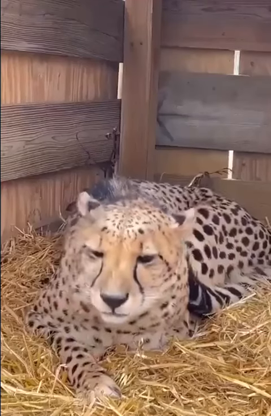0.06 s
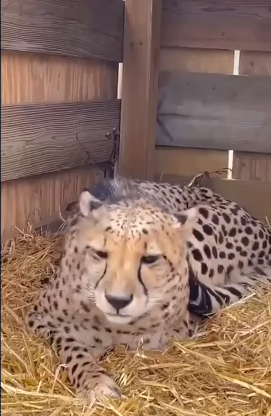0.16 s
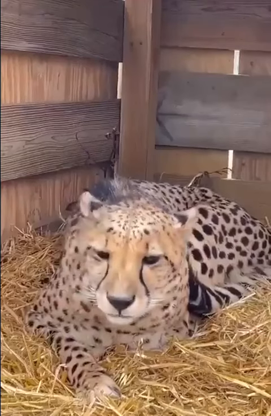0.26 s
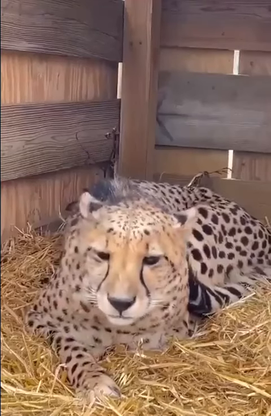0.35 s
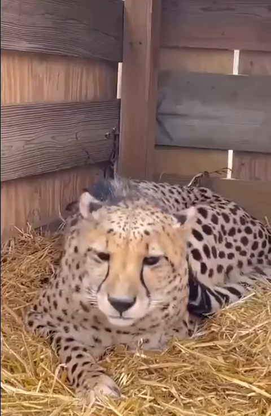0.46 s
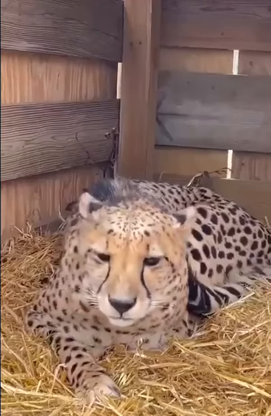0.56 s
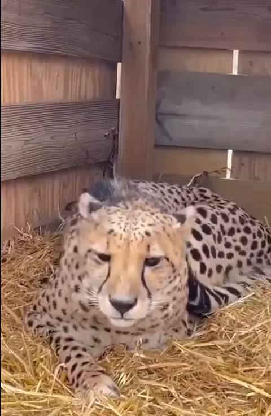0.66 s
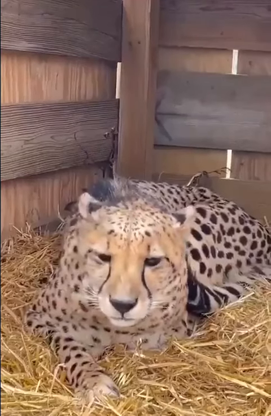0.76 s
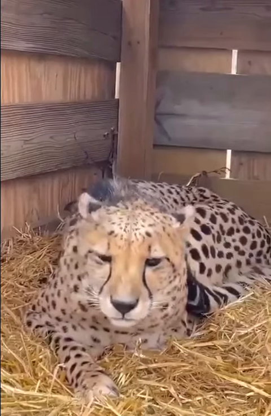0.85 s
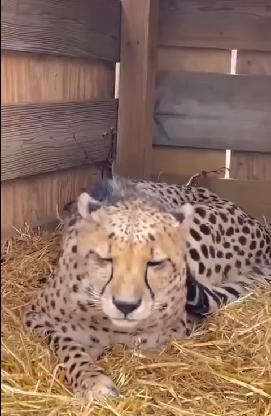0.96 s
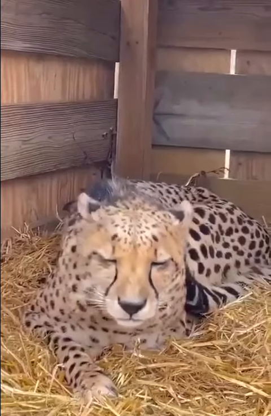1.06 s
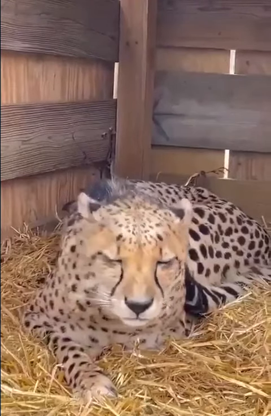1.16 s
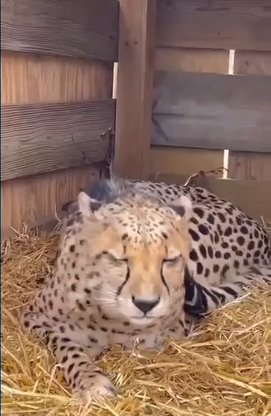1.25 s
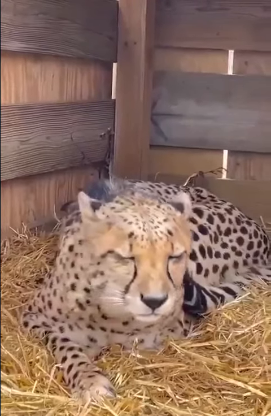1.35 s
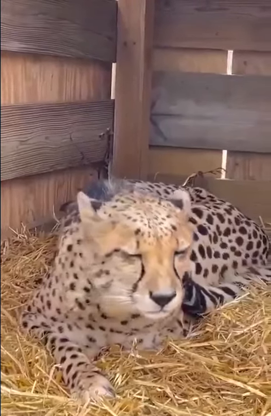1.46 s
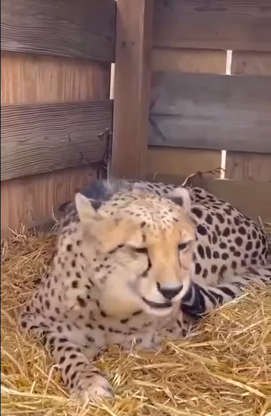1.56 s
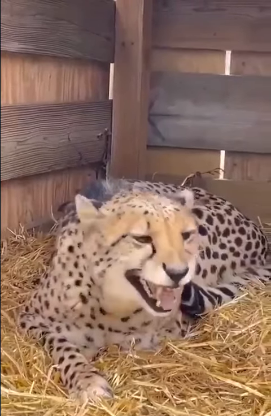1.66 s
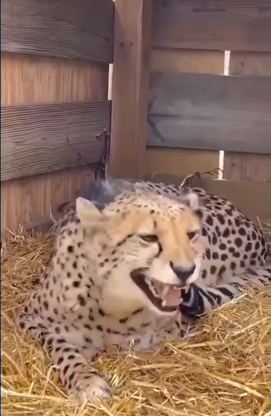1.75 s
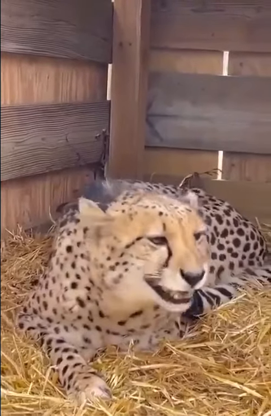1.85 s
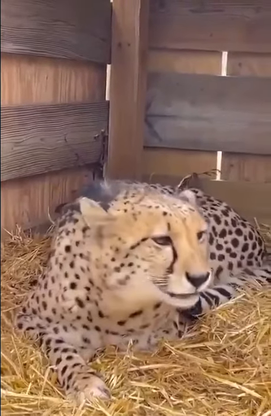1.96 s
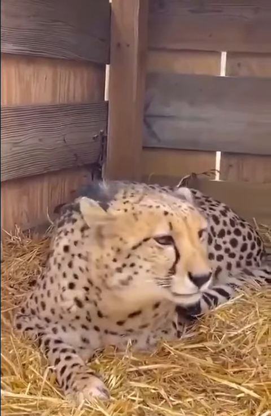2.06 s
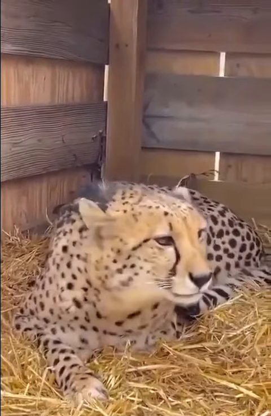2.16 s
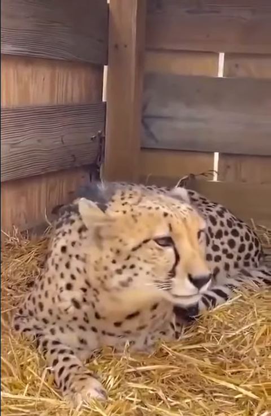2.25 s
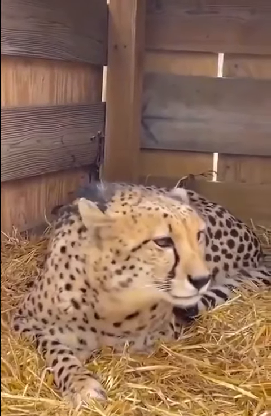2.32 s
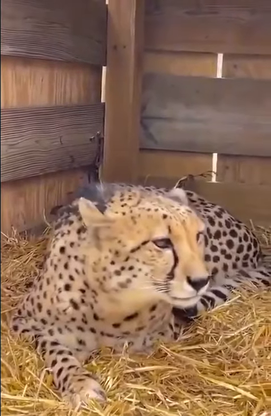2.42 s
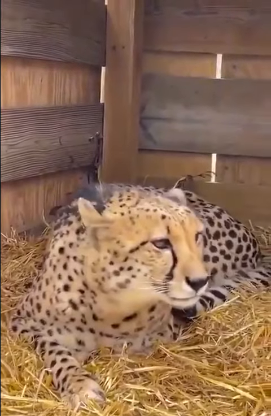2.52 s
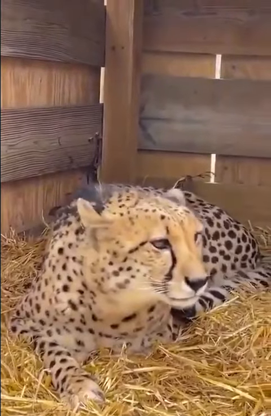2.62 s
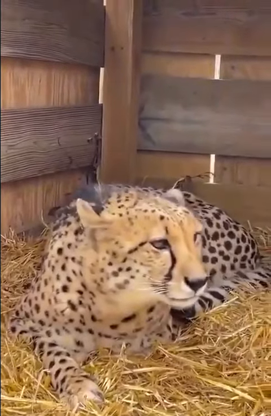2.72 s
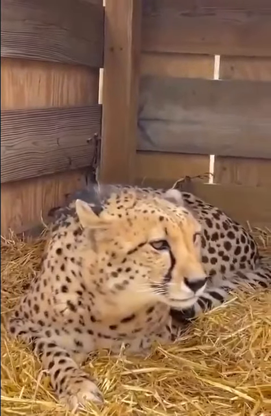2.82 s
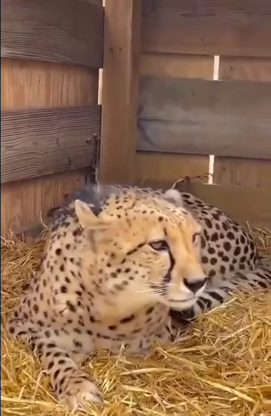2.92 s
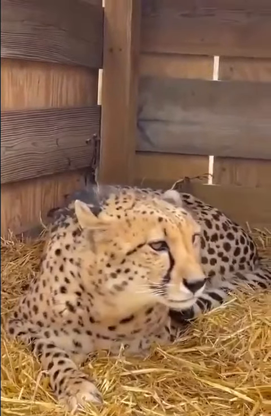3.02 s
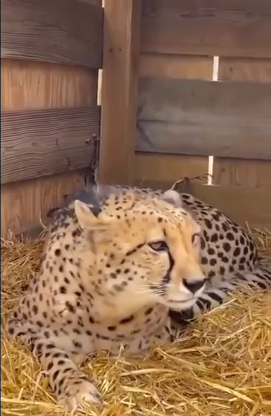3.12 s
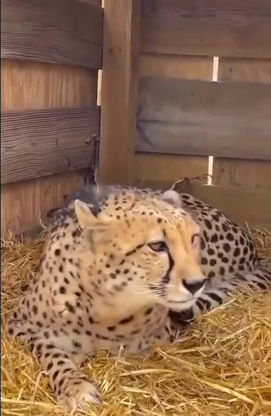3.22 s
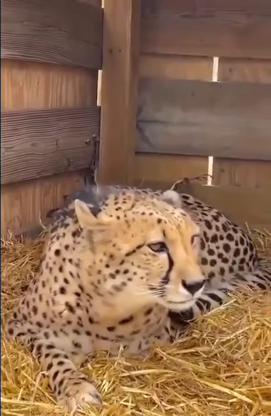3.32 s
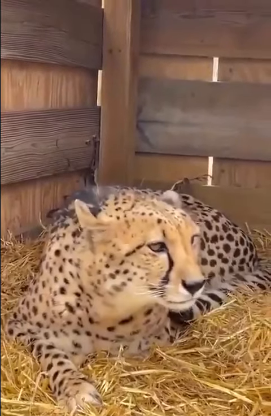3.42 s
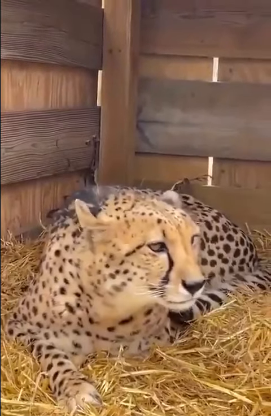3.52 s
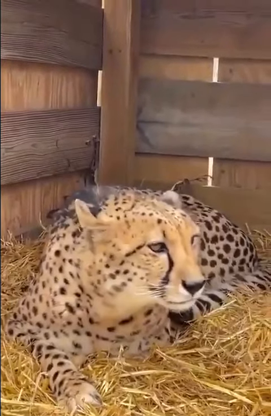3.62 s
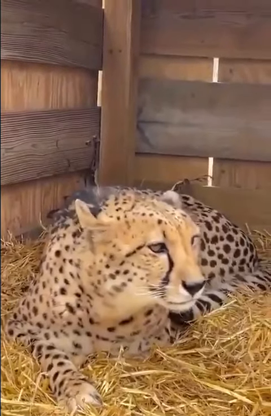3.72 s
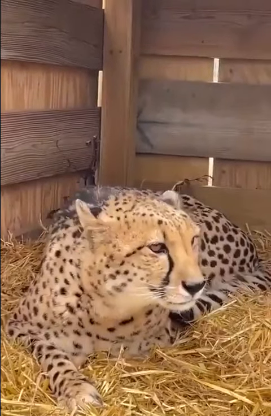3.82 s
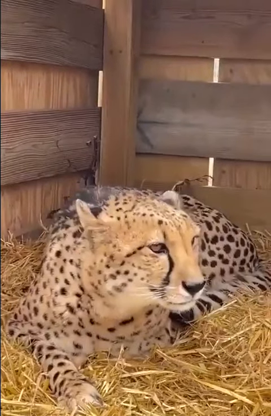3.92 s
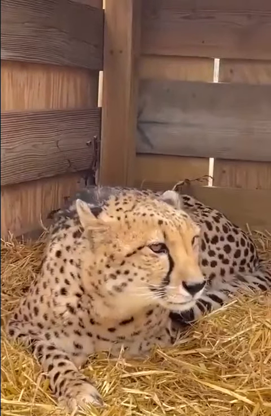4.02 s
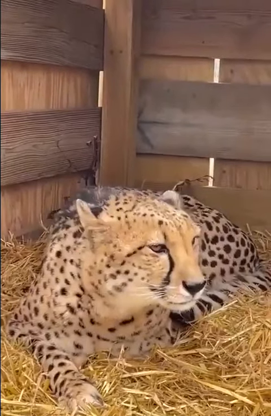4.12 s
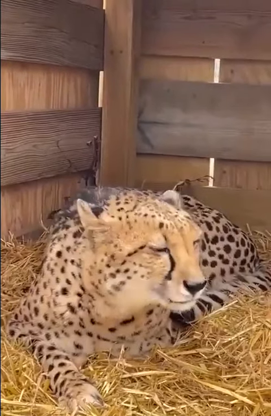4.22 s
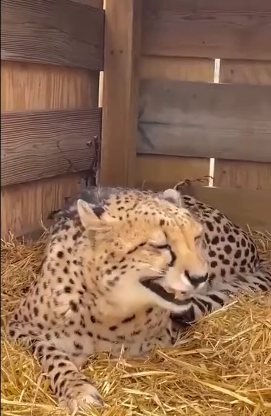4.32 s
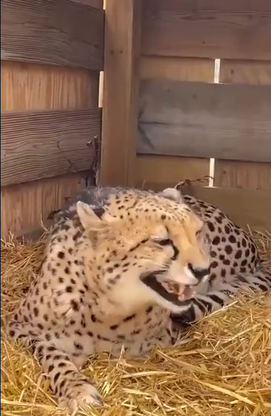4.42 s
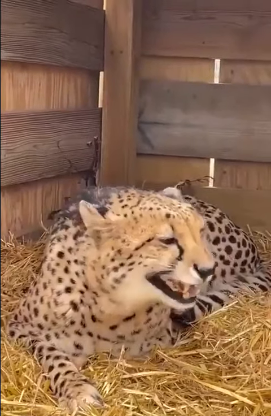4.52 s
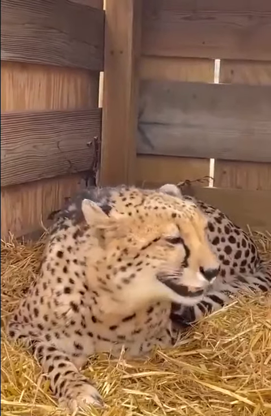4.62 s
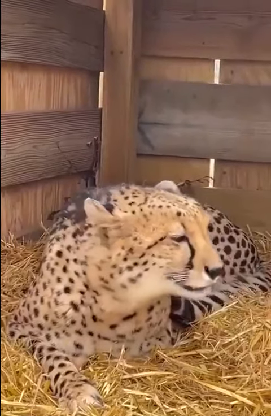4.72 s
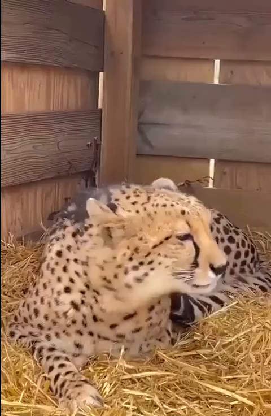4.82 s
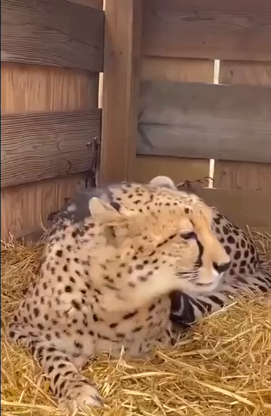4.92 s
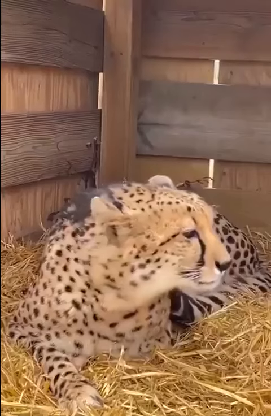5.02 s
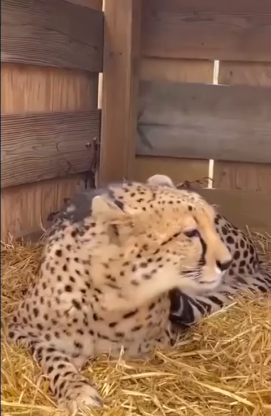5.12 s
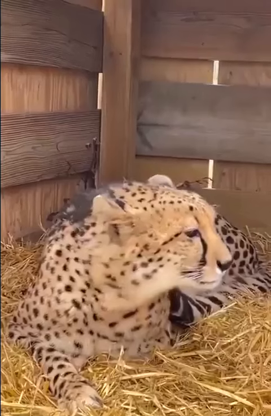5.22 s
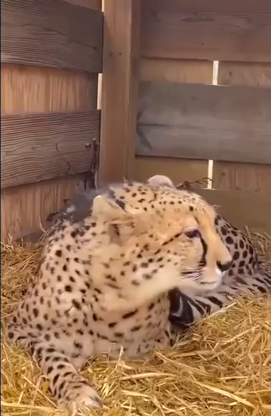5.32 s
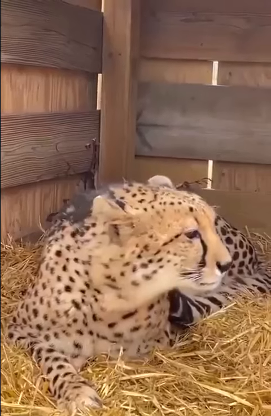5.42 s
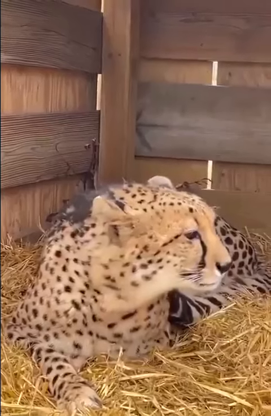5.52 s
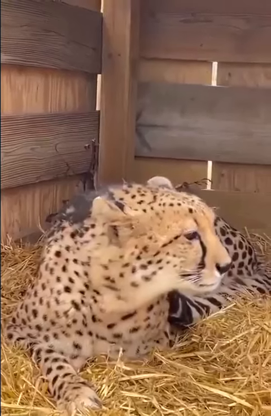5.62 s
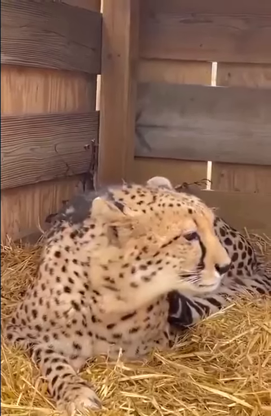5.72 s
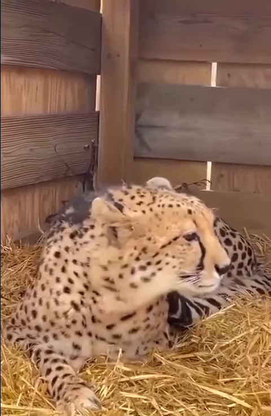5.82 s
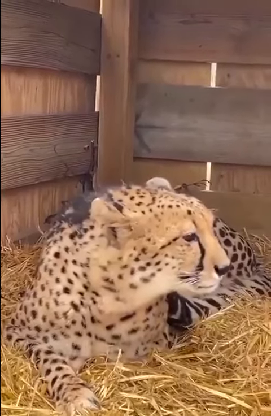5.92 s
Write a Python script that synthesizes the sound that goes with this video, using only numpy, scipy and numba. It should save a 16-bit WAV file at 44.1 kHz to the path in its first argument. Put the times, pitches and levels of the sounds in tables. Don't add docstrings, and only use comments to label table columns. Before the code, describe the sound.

Low engine throb fades to soft idle thumps as a cheetah chirps twice, like a bird, the second call lower, ending in a hum.

```python
import sys
import numpy as np
from scipy import signal
from scipy.fft import rfft, irfft, next_fast_len
from scipy.io import wavfile
from scipy.ndimage import uniform_filter1d
from numba import njit

SR = 44100
rng = np.random.default_rng(int(sys.argv[2]) if len(sys.argv) > 2 else 0)


def amplitude_ratio(level_db):
    exponent = np.asarray(level_db, float) / 20
    return 10 ** exponent


def wrap_up_sound(samples):
    columns = np.atleast_2d(samples).T
    tamed = np.clip(columns, -1, 1)
    steps = np.round(tamed * 32767).astype(np.int16)
    wavfile.write(sys.argv[1], SR, steps)


N = 263277
TIME_S = np.arange(N) / SR


def band(x, lo_hz, hi_hz, order=3):
    return signal.sosfilt(signal.butter(order, [lo_hz, hi_hz], "band", fs=SR, output="sos"), x)


def unit(x):
    return x / np.sqrt(np.mean(x ** 2))


def colour_db(table, hz):
    f, db = np.transpose(table)
    return np.interp(np.log(hz), np.log(f), db)


def coloured(table, lo_hz, hi_hz):
    hz = np.fft.rfftfreq(N, 1 / SR) + 1e-3
    gain = amplitude_ratio(colour_db(table, hz)) * (hz > lo_hz) * (hz < hi_hz)
    return unit(irfft(rfft(rng.standard_normal(N)) * gain, N))


def noise_pair(table, lo_hz, hi_hz, side_db):
    shared = coloured(table, lo_hz, hi_hz)
    opposed = coloured(table, lo_hz, hi_hz) * np.array([[1], [-1]])
    return shared + amplitude_ratio(side_db) * opposed


def walk(rate):
    hold = int(SR / rate)
    steps = np.repeat(rng.standard_normal(N // hold + 1), hold)
    return 1.4 * uniform_filter1d(uniform_filter1d(steps, hold), hold)[:N]


def curves(table):
    s, *columns = np.transpose(table)
    return [np.interp(TIME_S, s, c) for c in columns]


def bumps(table, t):
    return sum(size * np.exp(-((t - s) / length) ** 2) for s, length, size in table)


# (frequency [Hz], density [dB per Hz])
HISS_COLOUR = [(350, -30.5), (600, -1), (715, -15), (1050, 0), (1200, -6.5), (1440, -7.5), (2800, -6.5),
               (7550, -8.5), (8450, -20), (10900, -18), (12000, -22), (15600, -54), (22000, -120)]


def hiss():
    return amplitude_ratio(-82) * noise_pair(HISS_COLOUR, 300, 12200, -5.5)


# (time [s], level [dB])
ROAR_FADE = [(0, 2), (.3, 0.5), (.55, -3), (1.4, -5), (1.95, -6), (2.25, -14.5), (2.8, -19), (3.6, -19.5),
             (5.97, -24.5)]
# (frequency [Hz], density [dB per Hz])
ROAR_COLOURS = [
    [(15, -48.5), (30, -18), (55, 7), (100, 3.5), (150, -1.5), (230, -20), (400, -65)],
    [(120, -40), (200, 4), (250, 0.5), (320, -7.5), (480, -8), (600, -27.5), (900, -58)],
    [(350, -39.5), (550, 3.5), (900, 1.5), (1400, 0.5), (1650, -1), (2600, -6.5), (4000, -17), (7700, -21.5), (8300, -37.5), (10500, -33), (12200, -40)],
]


def roar():
    away_db, = curves(ROAR_FADE)
    idling = np.clip((TIME_S - 3.9) / 0.76, 0, 1)
    rumble_db = -46 + 0.013 * away_db - 6.5 * idling
    levels_db = rumble_db, -50.5 + away_db, -60.5 + away_db
    sides_db = -77.5, -21, -8
    flickers_db = 1, 1.2, .5
    return sum(amplitude_ratio(db + flicker_db * walk(5.4)) * noise_pair(colour, 11, 12200, side_db)
               for db, colour, side_db, flicker_db in zip(levels_db, ROAR_COLOURS, sides_db, flickers_db))


# (time [s], firing rate [Hz], level [dB], wall echo delay [ms], echo strength [0-1])
COASTING = [(0.0, 35.8, -42.4, 17.7, 0.11), (0.18, 35.6, -43.5, 19.1, 0.39),
            (0.34, 35.1, -45.1, 17.4, 0.94), (0.5, 33.4, -38.6, 19.7, 0.43),
            (0.66, 31.7, -35.0, 23.4, 0.03), (0.74, 30.9, -27.2, 25.5, 0.93),
            (0.89, 29.6, -24.8, 26.9, 0.95), (1.1, 28.2, -26.8, 27.7, 0.73),
            (1.22, 27.7, -26.5, 27.6, 0.65), (1.55, 26.4, -28.1, 30.8, 0.13),
            (1.96, 25.0, -30.6, 22.5, 0.09), (2.34, 23.7, -34.3, 20.9, 0.75),
            (2.6, 22.7, -37.1, 21.3, 0.88), (2.74, 22.1, -36.3, 20.2, 0.49),
            (2.98, 21.0, -37.1, 20.1, 0.95), (3.11, 20.2, -37.8, 20.9, 0.94),
            (3.49, 18.1, -43.9, 23.1, 0.44), (3.6, 17.4, -42.8, 13.7, 0.37)]
# (frequency [Hz], level [dB])
EXHAUST = [(35.0, -31.5), (50.0, -14), (72.0, -6), (100.0, -1.5), (120.0, -9.5), (145.0, -8.5),
           (168.0, -28), (212.0, -32)]
# (frequency [Hz], level [dB])
WEAK_ORDERS = [(20, -28), (29, -27), (36, -39.5), (130, -14), (155, -17.5), (195, -30), (225, -15),
               (252, -27), (280, -27), (330, -31.5), (450, -41.5)]
# (frequency [Hz], level [dB])
SCREENED_ORDERS = [(20, -33), (130, -20), (155, -18), (185, -14), (215, -27.5), (260, -28.5), (300, -45.5),
                   (450, -58)]
# (time [s], slip [rad])
THROB = [(0, .8), (.7, .9), (1.2, 1.0), (1.8, 1.2), (2.5, 1.2), (2.9, .3), (3.6, .3)]


def engine(turns):
    hz, level_db, echo_ms, echo = curves(COASTING)
    away_db, = curves(ROAR_FADE)
    spread, = curves(THROB)
    f = np.arange(2, 7)[:, None] * hz
    comb = np.abs(1 + np.clip(echo, 0, .95) * np.exp(2j * np.pi * f * echo_ms / 1000))
    throttle = np.clip((.37 - TIME_S) / .15 + 1, 0, 1)
    bright_db = throttle * 28 * np.log2(np.maximum(f / 95, 1))
    strong_db = level_db + colour_db(EXHAUST, f) + 20 * np.log10(comb) + bright_db
    mean_db = 10 * np.log10(np.mean(amplitude_ratio(strong_db) ** 2, axis=0))
    screened = np.clip((TIME_S - 2.74) / 0.31, 0, 1)
    phase = 2 * np.pi * (np.cumsum(hz * (1 + 0.0029 * walk(13.0))) / SR + turns)
    orders = list(enumerate(strong_db, start=2))
    for k in (1, *range(7, 16)):
        weak_db = (1 - screened) * colour_db(WEAK_ORDERS, k * hz) + screened * colour_db(SCREENED_ORDERS, k * hz)
        distance_db = 0.0125 * (k - 4) * away_db
        orders.append((k, mean_db + weak_db + min(k / 4, 3) * walk(5) + distance_db))
    hum = np.zeros(N)
    for k, db in orders:
        slip = spread * min(k - 4, 3) ** 2 + max(k - 7, 0) ** 2
        blur = .4 * max(k - 8, 0) * walk(12)
        hum += np.sqrt(2) * amplitude_ratio(db) * np.cos(k * phase + slip + blur)
    return hum * np.clip((COASTING[-1][0] - TIME_S) / 0.16, 0, 1)


# (time [s], firing rate [Hz], peak level [dB])
IDLE = [(3.567, 17.2, -34), (3.8, 16.48, -37), (4.12, 15.5, -40), (4.25, 14.69, -46), (4.5, 13.13, -45),
        (4.86, 11.7, -47), (4.95, 11.4, -38), (5.22, 11.037, -36), (5.31, 10.916, -42), (5.4, 10.795, -38),
        (5.49, 10.673, -42), (5.59, 10.54, -38), (5.69, 10.404, -41), (5.879, 10.15, -37), (5.97, 12, -40)]


def idle(cycles):
    out = np.zeros(N)
    rate, level_db = curves(IDLE)
    firings = np.cumsum(rate * (TIME_S >= IDLE[0][0])) / SR
    at = np.searchsorted(firings, np.arange(int(firings[-1]) + 1) + 1e-9)
    for i, (pitch, size) in zip(at, rng.standard_normal((40, 2))):
        near = slice(i - SR // 16, i + SR // 16)
        thump_hz = 84 * (1 + .06 * pitch)
        turn = (TIME_S[near] - TIME_S[i]) * thump_hz
        swing = np.exp(-(turn / cycles) ** 2) * np.cos(2 * np.pi * turn)
        out[near] += amplitude_ratio(level_db[i] + .7 * size + 0.5) * swing
    return out


# (time [s], length [s], centre [Hz], width [Hz], level
# [dB])
RUSTLES = [(1.117, .009, 720, 280, -53.5), (1.431, .051, 1200, 1200, -58.5),
           (1.509, .023, 1300, 1600, -48.5), (1.45, .4, 290, 120, -58), (4.12, .5, 340, 220, -67),
           (1.55, .05, 200, 130, -46), (.36, .36, 175, 70, -46), (4.16, .14, 2700, 1200, -58),
           (0, .003, 7500, 9000, -60), (4.16, .1, 7100, 1300, -66), (4.13, .07, 400, 200, -60),
           (1.6, .035, 3500, 300, -54), (1.74, .078, 1400, 640, -48.5), (1.79, .05, 10900, 1200, -79.5),
           (1.805, .025, 6300, 4000, -63), (3.15, .72, 1300, 500, -78.5), (3.83, .18, 11170, 1100, -72),
           (4.11, .05, 10400, 1200, -78.5), (4.123, .024, 3290, 300, -72), (4.146, .018, 1500, 1400, -47),
           (4.15, .086, 6300, 640, -58.5), (4.34, .11, 4300, 900, -64), (4.52, .11, 6200, 1200, -66),
           (1.625, .11, 3100, 1200, -54), (1.58, .16, 5900, 1000, -61), (1.55, .16, 4700, 800, -56),
           (4.56, .09, 2500, 900, -64), (4.16, .08, 1750, 700, -50), (4.4, .2, 6000, 1000, -64),
           (0, .6, 1650, 100, -70), (0, .6, 2400, 120, -78), (4.16, .3, 10200, 2200, -80),
           (4.25, .14, 4700, 350, -62), (4.7, .045, 1150, 250, -72), (4.645, .03, 2900, 200, -70),
           (4.645, .035, 2050, 300, -64), (4.85, .13, 2200, 120, -79), (4.9, .05, 1900, 150, -82),
           (4.85, .05, 2650, 150, -85), (4.61, .08, 7300, 1200, -80), (5.273, .06, 2800, 600, -80)]


def rustles():
    out = np.zeros(N)
    for s, length, hz, width, db in RUSTLES:
        i, n = int(s * SR), int(length * SR)
        grain = band(rng.standard_normal(N // 8), hz - width / 2, hz + width / 2)[999:999 + n]
        out[i:i + n] += amplitude_ratio(db) * unit(grain) * np.hanning(n) ** 0.87
    return out


@njit
def walls(x, lags, gain, damp):
    line, soft, out = np.zeros((8, 4096)), np.zeros(8), np.zeros((2, len(x)))
    for i in range(len(x)):
        total = 0.
        for k in range(8):
            soft[k] += (1 - damp) * (gain[k] * line[k, (i - lags[k]) & 4095] - soft[k])
            total += soft[k]
            out[k % 2, i] += soft[k]
        for k in range(8):
            line[k, i & 4095] = x[i] + soft[k] - total / 4
    return out


def pen_echo(cat):
    t60_s, damp, level_db = .1, .45, -14
    lags = rng.integers(150, 1100, 8)
    return amplitude_ratio(level_db) * walls(cat.mean(axis=0), lags, amplitude_ratio(-60 * lags / SR / t60_s), damp)


# (time [s], length [s], share of pitch [0-1])
WAVERS = [
    (1.515, .006, .015),
    (1.533, 0.0097, -.035),
    (1.562, .01, .022),
    (1.59, .01, .015),
    (1.63, 0.016, -0.0051),
    (4.33, .015, .01),
    (4.435, 0.028, -.012),
    (4.51, .012, -.012),
    (4.552, .012, -.013),
    (4.61, .01, -.015),
]
# (time [s], length [s], level [dB])
ACCENTS = [
    [(4.16, .02, -4.5), (4.31, .012, 0), (4.35, .015, 5), (1.74, .01, 9), (1.77, .01, 12), (1.815, .01, -7)],
    [(1.585, 0.021, 2.5), (4.48, .025, -7), (4.57, .012, 5), (4.61, .01, -8.5), (4.35, .01, -2)],
    [(1.52, 0.0063, 11.5), (1.534, 0.0082, 13), (1.548, .007, 6.5), (1.562, .007, -6.5), (1.595, .012, -4), (4.39, .012, 5), (4.49, .012, 2), (4.55, .01, -4.5), (4.59, .01, -4.5)],
    [(1.545, .008, 6.5), (1.61, 0.0092, 3.5), (1.64, .012, -8), (4.43, .025, 7.5), (4.485, .014, -18.5), (4.525, .018, 5), (4.57, .015, 6.5), (4.65, .012, 5.5)],
    [(1.63, 0.011, 4), (4.275, 0.019, -9), (4.5, 0.046, 5), (4.59, .01, 5)],
    [(1.53, .012, -8.5), (1.605, .008, 8), (1.665, .01, 9), (4.385, .025, 6), (4.47, 0.036, -12)],
]
# (time [s], length [s], depth [0-1], below 0 a surge)
CATCHES = [(1.627, 0.0027, 0.18), (1.774, 0.022, 0.7), (4.335, 0.01, 0.1), (4.372, 0.006, -0.43),
           (4.382, 0.004, 0.47), (4.422, 0.0066, 0.072), (4.431, 0.0041, 0.24), (4.243, .008, -0.36),
           (1.638, .005, -.45), (1.662, .005, -0.27), (1.552, 0.0055, -.3), (1.559, .003, .5),
           (4.16, 0.0029, 0.89), (4.52, 0.013, -0.28), (1.6, 0.01, -0.16), (1.651, 0.005, -0.22),
           (1.675, 0.005, 0.1), (4.437, 0.0048, 0.1), (4.501, 0.0082, 0.15), (4.575, 0.005, 0.45),
           (4.641, 0.0063, 0.94)]


def chirp(sections, paths, throat, gape, mouth_db, bright_db, edge_s, mouth_breath, bright_breath):
    rows = np.concatenate(sections)
    on = slice(int(rows[0, 0] * SR), int((rows[-1, 0] + edge_s) * SR))
    t = TIME_S[on]
    hz, effort_db, opening, rasp_db = (uniform_filter1d(c, size=300)[on] for c in curves(rows))
    hz = hz * (1 + bumps(WAVERS, t))
    accent_db = np.array([bumps(a, t) for a in ACCENTS])
    shut = 1 - np.clip(opening, 0, 1)
    late = np.clip((t - sections[1][0][0]) / 0.019, 0, 1)

    phase = 2 * np.pi * np.cumsum(hz * (1 + 0.0044 * walk(150)[on] + .002 * walk(40)[on])) / SR
    voice = np.zeros(len(t))
    for k in (1, 2, 3):
        path_db = (1 - late) * colour_db(paths[0], k * hz) + late * colour_db(paths[1], k * hz)
        db = effort_db + path_db - 20.5 * shut * (k - 1) + accent_db[k - 1]
        flutter_db = 1.2 * walk(70)[on] + .75 * walk(300)[on]
        voice += np.sqrt(2) * amplitude_ratio(db + flutter_db) * np.sin(k * phase + k * k)

    ring_db, breath_db = (c[on] for c in curves(gape))
    mouth_db = mouth_db + ring_db + effort_db - 58.5 * shut
    bright_db = bright_db + breath_db + effort_db - 43.5 * shut
    k = np.arange(4, 17)[:, None]
    f = k * hz
    partials = np.sin(k * phase + k * k)
    for lo_hz, hi_hz, db, breath in ((1450, 3600, mouth_db, mouth_breath),
                                     (3860, 14000, bright_db + 0.5, bright_breath)):
        lower_edge = np.clip((f - lo_hz) / 150, 0, 1)
        upper_edge = np.clip((min(hi_hz, 6500) - f) / 150, 0, 1)
        slow_db = np.clip(k - 4, 1, 3) * np.array([walk(40)[on] for _ in k])
        fast_db = 1.4 * np.array([walk(160)[on] for _ in k])
        size = amplitude_ratio(colour_db(throat, f)) * lower_edge * upper_edge
        size *= amplitude_ratio(-8 * np.clip(k - 5, 0, 1) + slow_db + fast_db)
        level = np.sqrt(2 / uniform_filter1d(np.sum(size ** 2, axis=0), size=900))
        clean = np.sum(size * partials, axis=0) * level
        clean += np.sum(size[:3] * (amplitude_ratio(accent_db[3:]) - 1) * partials[:3], axis=0) * level
        air = noise_pair(throat, lo_hz, hi_hz, -10.5)[:, on] * (1 + 0.2 * np.sin(phase))
        breath = breath * (1 - .9 * late)
        voice = voice + amplitude_ratio(db) * (np.sqrt(1 - breath) * clean + np.sqrt(breath) * air)

    for s, length, depth in CATCHES:
        voice *= 1 - np.clip(depth, -1, 1) * np.exp(-((t - s) / length) ** 2)
    voice += amplitude_ratio(rasp_db + 7.0) * unit(band(rng.standard_normal(N), 1000, 2700))[on]
    out = np.zeros((2, N))
    out[:, on] = voice * np.clip((t - t[0]) / 0.0069, 0, 1) * np.clip((t[-1] - t) / edge_s, 0, 1)
    return out


# (frequency [Hz], level [dB])
THROATS = [
    [(1290, -36.5), (2200, 0.5), (2610, -10.5), (3120, 6), (3640, -19.5), (3800, -35), (4050, -18.5), (4770, -3), (5380, -23.5), (5900, -23), (6500, -30.5), (7840, -35), (8360, -42), (9100, -32), (10900, -25), (12000, -60.5), (15600, -84.5), (22000, -120)],
    [(1180, -28.5), (2000, 6.5), (2090, -16), (2310, -22.5), (2780, -15), (3380, -19), (3810, -45.5), (4630, -34), (5670, -35), (6940, -40.5), (7710, -60), (8310, -84), (10900, -55), (12000, -85.5), (15600, -106), (22000, -120)],
]
# (frequency [Hz], level [dB])
JAWS = [
    [(454.0, 14.5), (577.0, -20.5), (659.0, -31), (747.0, -19), (1157.0, 3), (1550.0, 1.1), (1861.0, 14), (2390.0, -11.5)],
    [(454.0, -21.5), (577.0, 2), (659.0, -7.5), (747.0, -19), (1157.0, 11.5), (1550.0, 12.5), (1861.0, 9), (2390.0, 15.5)],
]
# (time [s], mouth ring [dB], bright breath [dB])
GAPES = [
    [(1.5, -13, -10), (1.535, -5, -3), (1.555, 2.5, 4), (1.595, 1.5, 6), (1.615, 5, 4), (1.635, -4, 1.5), (1.7, -4.5, 1.5), (1.75, -3.5, 1.5), (1.9, 2, 5)],
    [(4.145, 2.5, -7), (4.2, 1.5, -1), (4.3, 1, 3), (4.38, 3.5, 3), (4.48, 1, -3), (4.56, -4, -2.5), (4.61, 26, -9), (4.63, 7, -8), (4.74, -11, -11)],
]
# (time [s], pitch [Hz], effort [dB], mouth opening [0-1], rasp [dB])
FIRST_CHIRP = [
    (1.503, 777.4, -55.5, 1, -65),
    (1.52, 768.8, -28, 0.55, -59),
    (1.55, 792.5, -37, 0.98, -58.0),
    (1.58, 828.5, -31.5, 0.81, -58.5),
    (1.608, 768.2, -30, 0.86, -53),
    (1.636, 676, -12.5, 0.53, -57.5),
    (1.657, 624.5, -7.5, 0.29, -52),
    (1.697, 556.6, -20.5, 0.59, -51),
    (1.737, 591.4, -31, 0.36, -62.0),
]
# (time [s], pitch [Hz], effort [dB], mouth opening [0-1], rasp [dB])
AFTER_NOTE = [
    (1.76, 655, -26.5, 0.017, -73.5),
    (1.79, 677, -27.5, 0.0072, -79),
    (1.811, 671, -29.5, 0.047, -67.5),
    (1.838, 660, -28.5, 0.068, -71),
    (1.849, 587, -31, 0.013, -69),
    (1.871, 542, -28, 0.0091, -77),
    (1.901, 565, -64, 0.12, -78),
]
# (frequency [Hz], level [dB])
NOSE = [(545, -12), (612, -18.5), (680, -31.5), (1160, -0.5), (1355, 6), (1650, 7), (1830, 27.5),
        (2040, -6)]


def first_chirp():
    return chirp((FIRST_CHIRP, AFTER_NOTE), (JAWS[0], NOSE), THROATS[0], GAPES[0], mouth_db=.5, bright_db=-13.0,
                 edge_s=.012, mouth_breath=.08, bright_breath=.4)


# (time [s], pitch [Hz], effort [dB], mouth opening [0-1], rasp [dB])
SECOND_CHIRP = [
    (4.145, 573.8, -56, 0.65, -84.5),
    (4.177, 558.5, -35.5, 0.69, -59),
    (4.2, 571.6, -42.5, 0.94, -56.5),
    (4.25, 662, -36.5, 0.82, -60),
    (4.3, 687, -36.5, 0.98, -63.5),
    (4.36, 646.7, -32, 0.9, -68.5),
    (4.41, 591.4, -35, 0.98, -68),
    (4.466, 550.5, -30.5, 0.89, -68),
    (4.56, 527.9, -33, 0.7, -70),
]
# (time [s], pitch [Hz], effort [dB], mouth opening [0-1], rasp [dB])
ENDING = [
    (4.588, 500, -34.5, 0.52, -77),
    (4.613, 497.2, -21, 0.21, -74),
    (4.624, 460.7, -16.5, .02, -70),
    (4.659, 417.2, -17.5, 0.051, -66),
    (4.698, 402.7, -40, 0.021, -78.5),
    (4.74, 397, -64, 0.21, -84.5),
]
# (frequency [Hz], level [dB])
CHEST = [(420, -15), (455, -16), (510, -9), (900, -24.5), (985, 8.5), (1200, 5), (1350, 15.5), (1530, -4)]


def second_chirp():
    return chirp((SECOND_CHIRP, ENDING), (JAWS[1], CHEST), THROATS[1], GAPES[1], mouth_db=-7.5, bright_db=-20,
                 edge_s=.012, mouth_breath=.36, bright_breath=.3)


def scene():
    cat = first_chirp() + second_chirp() + rustles()
    return hiss() + roar() + engine(turns=.3) + idle(cycles=0.88) + pen_echo(cat) + cat


# (start [s], end [s], from [Hz], to [Hz])
SEAMS = [(1.54, 1.645, 3600, 3850), (1.62, 1.73, 3860, 4080), (1.6, 1.76, 5300, 5480),
         (1.6, 1.72, 6550, 6700), (1.52, 1.74, 7950, 8450), (4.15, 4.245, 3600, 3850),
         (4.26, 4.295, 4150, 4400), (4.29, 4.44, 3680, 3950), (4.26, 4.37, 7080, 7250),
         (4.37, 4.56, 6780, 6950), (4.34, 4.6, 7600, 8450), (4.46, 4.56, 2330, 2520),
         (4.48, 4.7, 3380, 3620), (4.5, 4.6, 4000, 4500)]


def patchy(x, from_hz, spread_db, hole, loud_hole, bins, frames):
    hz, t, z = signal.stft(x, SR, nperseg=1024, boundary="odd")
    size = np.abs(z)
    chance = rng.standard_normal((2, z.shape[0], z.shape[1]))
    fine = np.repeat(chance[0], frames, axis=1)[:, :z.shape[1]]
    fine = uniform_filter1d(fine, size=frames, axis=1)
    coarse = np.repeat(np.repeat(chance[1], bins, axis=0), frames, axis=1)[:z.shape[0], :z.shape[1]]
    call = size[hz > 900].max(axis=0)
    loud = call > amplitude_ratio(-50)
    holes = (coarse > np.where(loud, loud_hole, hole)) & (hz[:, None] > np.where(loud, 2200, 3500))
    for start, end, lo, hi in SEAMS:
        holes |= np.outer((hz > lo) & (hz < hi), (t > start) & (t < end))
    strong = uniform_filter1d(size, size=3, axis=0) > np.maximum(amplitude_ratio(-65), amplitude_ratio(-32) * call)
    holes &= ~strong
    depth_db = spread_db * np.clip((hz[:, None] - from_hz) / from_hz, 0, 1) * np.where(strong, .3, 1)
    gain = amplitude_ratio(depth_db * fine - depth_db ** 2 / 10) * np.where(holes, .05, 1)
    return signal.istft(z * gain, SR, nperseg=1024)[1][:N]


# (frequency [Hz], when quiet [0-1], under a call [0-1])
SIDE_KEPT = [(250, 1, .35), (450, 1, .35), (520, 1, .95), (800, 1, .8), (1000, 1, .55), (1550, 1, .45),
             (1800, 0, .45), (2300, 0, .35), (2600, 0, .1), (4100, 0, .15), (4400, .15, .75),
             (5000, .4, .8), (5300, .9, .65), (5900, .85, .5), (6400, .1, .15), (7800, .05, 0),
             (8900, 0, 0)]


def thinned(side, mid, bins, frames):
    hz, _, z = signal.stft(side, SR, nperseg=1024, boundary="odd")
    middle = np.abs(signal.stft(mid, SR, nperseg=1024, boundary="odd")[2])
    loud = middle[hz > 380].max(axis=0) > amplitude_ratio(-50)
    f, quiet, call = np.transpose(SIDE_KEPT)
    share = np.where(loud, np.interp(hz, f, call)[:, None], np.interp(hz, f, quiet)[:, None])
    chance = np.repeat(np.repeat(rng.random(z.shape), bins, axis=0), frames, axis=1)[:z.shape[0], :z.shape[1]]
    return signal.istft(z * (chance < share), SR, nperseg=1024)[1][:N]


def low_pass(x):
    return signal.sosfilt(signal.butter(12, 12230, fs=SR, output="sos"), x)


# (from [Hz], to [Hz], shift [Hz], level [dB], tilt [dB per kHz])
COPIES = [
    (950, 2350, 5512, -48, 3),
    (904.3, 2500, 7579, -57, -6),
    (2500, 3800, 7579, -40.5, 3),
]
# (frequency [Hz], level [dB])
MIC = [(20, 2), (4700, 0), (4920, -7.5), (5100, 1), (7800, 0.5), (8150, -7), (8500, 0), (9700, -1),
       (10150, -5), (10600, 2), (11700, -1), (12200, -9.5)]
# (frequency [Hz], level [dB])
PORTS = [(100, -47), (250, -13), (400, 7.5), (1400, -1), (2050, -1), (2400, -10.5), (3100, -14.5),
         (3900, -12), (4500, 5.5), (5500, 3), (6300, -1.5), (7400, 0.5), (8200, -14.5), (12200, -19)]


def record(dry):
    margin = 4096
    tail = next_fast_len(N + 2 * margin) - N - margin
    dry = np.pad(dry, ((0, 0), (margin, tail)), mode="reflect", reflect_type="odd")
    n = dry.shape[1]
    dry = dry * signal.windows.tukey(n, margin / N)
    hz = np.fft.rfftfreq(n, 1 / SR) + 1e-3
    mid, side = rfft(dry[0] + dry[1]) / 2, rfft(dry[0] - dry[1]) / 2
    patch = 0
    for lo_hz, hi_hz, shift_hz, db, tilt_db in COPIES:
        edges = np.clip((hz - lo_hz) / 100, 0, 1) * np.clip((hi_hz - hz) / 100, 0, 1)
        copy = mid * edges * amplitude_ratio(db + tilt_db * (hz - lo_hz) / 1000)
        patch = patch + np.roll(copy, int(shift_hz * n / SR))
    mic_db = colour_db(MIC, hz)
    mid = irfft((mid + patch) * amplitude_ratio(mic_db), n)[margin:margin + N]
    mid = patchy(mid, from_hz=1500, spread_db=4.8, hole=1.8, loud_hole=1.2, bins=3, frames=6)
    side = irfft(side * amplitude_ratio(mic_db + colour_db(PORTS, hz)), n)[margin:margin + N]
    side = thinned(side, mid, bins=7, frames=4)
    return low_pass(np.array([mid + side, mid - side]))


dry = scene()
out = record(dry)
wrap_up_sound(out)
```